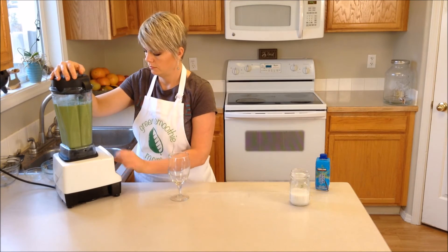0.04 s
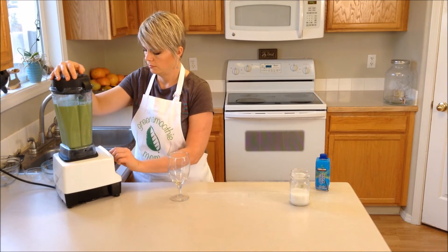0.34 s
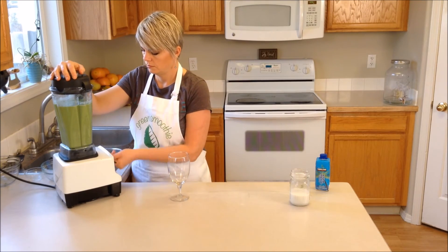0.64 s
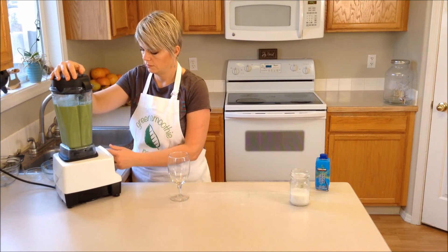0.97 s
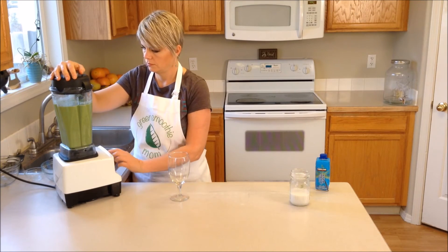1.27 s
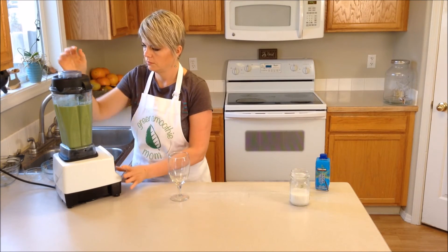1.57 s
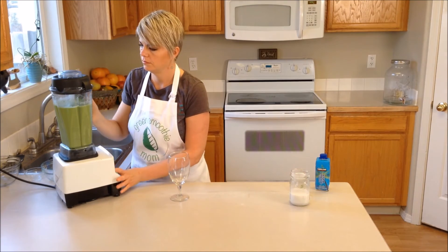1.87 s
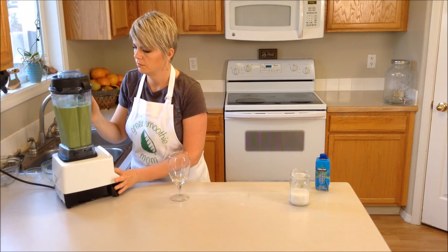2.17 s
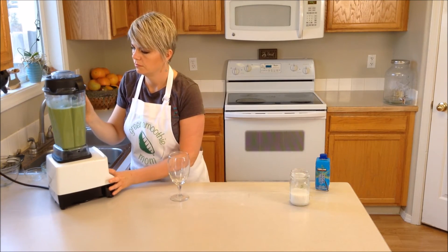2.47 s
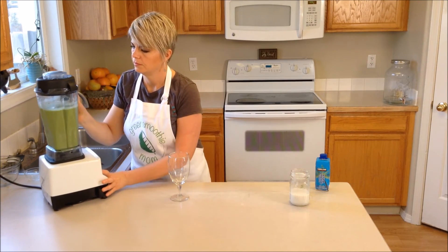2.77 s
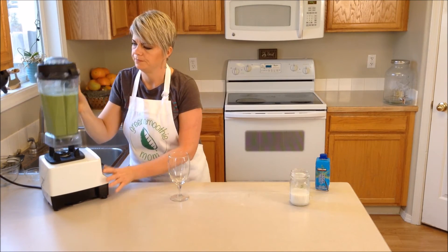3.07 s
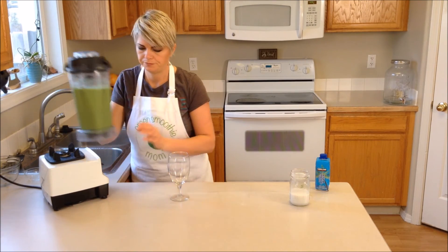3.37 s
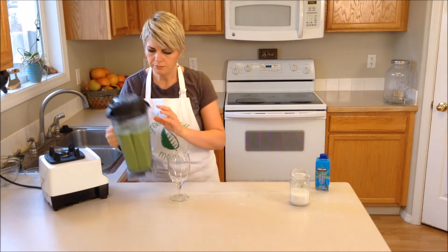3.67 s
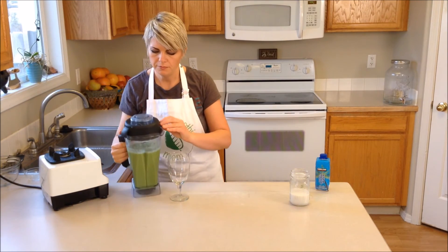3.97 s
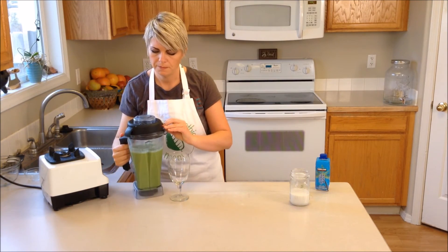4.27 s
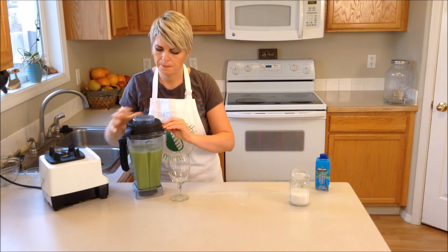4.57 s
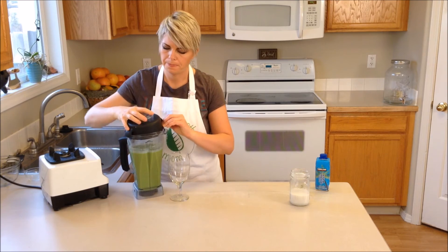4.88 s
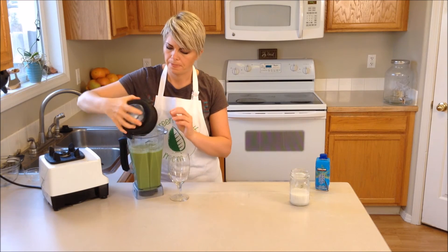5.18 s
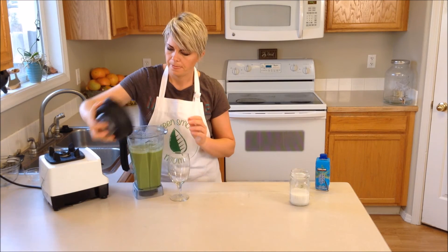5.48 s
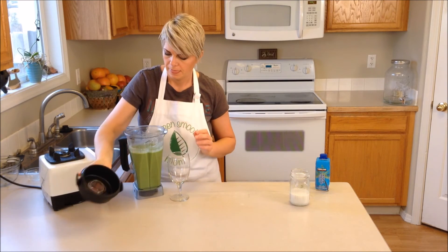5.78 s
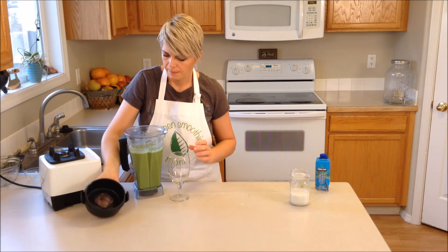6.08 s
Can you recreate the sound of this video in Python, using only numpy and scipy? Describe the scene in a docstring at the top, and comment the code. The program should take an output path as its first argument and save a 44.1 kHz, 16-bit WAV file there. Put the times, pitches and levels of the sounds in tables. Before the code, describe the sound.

A countertop blender full of smoothie snaps off and winds down, then its jar knocks on the counter and the lid pops off.

```python
"""A countertop blender full of smoothie is turned down, snaps off and coasts to a stop.
Its shaft shakes the base, whines in the housing, drives a fan and beats the load, all at one speed.
The plastic jar is lifted off and knocks on the counter; the rubber lid slips, pops free and is put down.
One microphone hears it across a hard-walled kitchen, over a faint appliance hum."""
import sys
import numpy as np
from scipy import signal
from scipy.fft import rfft, irfft, next_fast_len
from scipy.io import wavfile
from scipy.ndimage import map_coordinates

SR = 44100
rng = np.random.default_rng(int(sys.argv[2]) if len(sys.argv) > 2 else 0)


def store_pcm(level_fs):
    """Save levels as 16-bit WAV."""
    pcm = np.round(np.clip(level_fs, -1, 1) * 32767).astype(np.int16)
    wavfile.write(sys.argv[1], SR, np.atleast_2d(pcm).T)


N = 270333
TIME_S = np.arange(N) / SR


def amp(db):
    """Decibels to gain."""
    return 10 ** (np.asarray(db) / 20)


def unit_rms(x):
    """Scale to rms 1."""
    return x / np.sqrt(np.mean(x ** 2) + 1e-20)


def unit_energy(x):
    """Scale to energy 1."""
    return x / np.linalg.norm(x)


def along(points, hz):
    """Read (Hz, value) points on a log axis."""
    f, v = np.transpose(points)
    return np.interp(np.log(hz + 1), np.log(f + 1), v)


def wobble(rate_hz):
    """Smooth random curve, rate_hz knots a second."""
    knots = rng.standard_normal(int(N * rate_hz / SR) + 4)
    return map_coordinates(knots, [TIME_S * rate_hz])


def filtered(x, response):
    """Apply a frequency response."""
    size = next_fast_len(N + SR // 2)
    return irfft(rfft(x, size) * response(np.fft.rfftfreq(size, 1 / SR)), size)[:N]


def highpass(x, edge_hz):
    """Cut the bass."""
    return signal.sosfilt(signal.butter(4, edge_hz, "highpass", fs=SR, output="sos"), x)


def resonance(modes, f):
    """Response of (Hz, width Hz, dB) modes."""
    return sum(amp(db) * 1j * f * width / (hz * hz - f * f + 1j * f * width) for hz, width, db in modes)


def noise(response):
    """Coloured noise of rms 1."""
    return unit_rms(filtered(rng.standard_normal(N), response))


def impact(spectrum, tilt_db, size=4096):
    """Causal pulse of energy 1; harder contacts tilt its spectrum upward."""
    hz = np.fft.rfftfreq(size, 1 / SR)
    cepstrum = irfft(np.log(amp(along(spectrum, hz) + tilt_db * np.log2(1 + hz / 200))))
    cepstrum[1:size // 2] *= 2  # fold to minimum phase
    cepstrum[size // 2 + 1:] = 0
    return unit_energy(irfft(np.exp(rfft(cepstrum))))


def add(track, start_s, sound):
    """Mix a sound into the track."""
    part = track[round(start_s * SR):][:len(sound)]
    part += sound[:len(part)]


# kitchen echo decay (frequency [Hz], t60 [s])
ROOM_DECAY = [(120, 0.57), (300, 0.51), (1000, 0.61), (4000, 0.55), (8000, 0.35), (14000, 0.18)]
def room(x, direct_db):
    """Direct sound plus a fresh diffuse echo, total energy kept."""
    hz, t, spectra = signal.stft(rng.standard_normal(SR * 3 // 4), SR, nperseg=256)
    decay = amp(-60 * t / along(ROOM_DECAY, hz)[:, None])
    tail = signal.istft(spectra * decay, SR, nperseg=256)[1]
    tail *= 1 - np.exp(-np.arange(len(tail)) / SR / 0.00074)
    tail = unit_energy(tail)
    tail[0] = amp(direct_db)
    return signal.fftconvolve(x, unit_energy(tail))[:N]


# appliance tones (frequency [Hz], rms level [dB])
HUM_TONES = [(199.2, -66.5), (403.7, -62.5), (1157, -75.5), (1610, -71)]
# vent modes (frequency [Hz], width [Hz], gain [dB])
VENT_MODES = [(437, 91, -2.5), (840, 86, -3), (1565, 370, -4.5)]
# room air (frequency [Hz], relative density [dB])
ROOM_SPECTRUM = [(24, -80), (40, -34), (91, -35), (108, -14), (166, -14.5), (188, -7), (377, -6),
                 (407, -14), (438, -13.5), (1190, -19), (1310, -20.5), (1560, -26.5), (2510, -26.5),
                 (13300, -38.5), (15500, -38)]
def background():
    """Room air, and an appliance fan humming through its vent."""
    hum = sum(amp(db + 1.8 * wobble(4.23)) * np.sin(2 * np.pi * hz * TIME_S + 0.5 * wobble(5.26))
              for hz, db in HUM_TONES)
    vent = amp(-63) * noise(lambda f: abs(resonance(VENT_MODES, f)) ** 2)
    air = amp(-56.5) * noise(lambda f: amp(along(ROOM_SPECTRUM, f)))
    return air + vent + np.sqrt(2) * hum


# lid on counter (frequency [Hz], relative density [dB])
SCUFF_SPECTRUM = [(300, -27), (750, -1), (1300, -12), (2100, -8), (2450, 0.5), (3400, -3.5), (4000, -6),
                  (5400, -8), (6500, -14), (8500, -20), (11000, -30), (15000, -35)]
def lid_scuff(start_s=5.955, rise_s=0.019, fade_db_per_s=79):
    """The lid's edge brushes the counter as it is put down."""
    t = TIME_S - start_s
    level_db = -49 - fade_db_per_s * np.maximum(t, 0) + 1.8 * wobble(110)
    stroke = np.clip(t / rise_s, 0, 1) * amp(level_db)
    return room(stroke * noise(lambda f: amp(along(SCUFF_SPECTRUM, f))), direct_db=6)


# one tug of rubber (frequency [Hz], relative density [dB])
RUBBER_SPECTRUM = [(60, -32), (160, 3), (280, 11), (480, 1), (720, 0), (1000, 3), (1450, -4), (2200, -10.5),
                   (4000, -24), (9000, -40), (15000, -45)]
# slips on the rim (time [s], relative level [dB], length [s], tilt [dB/octave], ring [Hz])
LID_SLIPS = [(4.858, -50, .016, 5.5, 745), (4.875, -44.5, 0.023, 4, 734), (4.9, -51, .02, 4, 1600),
             (4.941, -50.5, 0.059, 3, 1480), (5.08, -51.5, 0.00505, 1, 1680), (5.147, -47, 0.04, 1.5, 634),
             (5.178, -55, 0.0086, 0, 690), (5.303, -57, 0.031, 6, 730)]
def lid_slips():
    """The seal sticks and slips in short runs; each slip rings the hollow lid at a varying pitch."""
    track = np.zeros(N)
    t = np.arange(SR // 10) / SR
    for start_s, db, length_s, tilt_db, ring_hz in LID_SLIPS:
        run = np.zeros(SR // 4)
        tug = impact(RUBBER_SPECTRUM, tilt_db)
        onsets_s = length_s * np.append(0, np.sort(rng.random(24)))
        for onset_s, (strength, detune) in zip(onsets_s, rng.standard_normal((25, 2))):
            hz = ring_hz * np.exp(0.05 * detune)
            ring = np.sin(2 * np.pi * hz * t) * amp(-60 * t / 0.024) * (1 - np.exp(-hz * t))
            add(run, onset_s, strength * unit_energy(ring))
            add(run, onset_s, strength * tug)
        add(track, start_s, amp(db + 31) * room(unit_energy(run), direct_db=1.5))
    return highpass(track, 114)


# hollow lid modes (frequency [Hz], relative level [dB], t60 [s])
LID_MODES = [(215, -2, 0.085), (318, 3.5, 0.062), (736, -9, 0.061), (1380, -2, 0.086), (1460, -7, .08),
             (1720, -10, 0.065), (2300, -12, .05)]
def lid_pop(start_s=4.892):
    """The seal gives way at once and the lid rings."""
    track = np.zeros(N)
    t = np.arange(SR // 5) / SR
    ring = sum(amp(db - 60 * t / t60) * np.sin(2 * np.pi * hz * t) for hz, db, t60 in LID_MODES)
    ring *= 1 - np.exp(-t / 0.0014)
    add(track, start_s, amp(-11) * room(unit_energy(ring), direct_db=6))
    return highpass(track, 125)


# pad and drive socket modes (frequency [Hz], width [Hz], gain [dB])
SOCKET_MODES = [(595, 210, 5), (820, 51, 11), (1180, 110, -2), (2480, 390, -15)]
# jar catching on the base
# (time [s], relative knock [dB], tilt [dB/octave], relative tick [dB], tick [Hz], tick width [Hz])
LIFT_CATCHES = [(2.833, -64, 5, -56, 5200, 420), (2.972, -51.5, -2, -64, 5300, 260),
                (3.04, -55, -7, -78, 4700, 260), (3.079, -47.5, 2.5, -61, 4700, 45),
                (3.112, -55, -19, -80, 4700, 260)]
def jar_lift():
    """The rising jar nudges the pad; the drive splines tick as they let go."""
    def struck(modes):
        return unit_energy(filtered(np.ones(1), lambda f: resonance(modes, f))[:SR // 10])

    track = np.zeros(N)
    for start_s, knock_db, tilt_db, tick_db, tick_hz, tick_width_hz in LIFT_CATCHES:
        knock = struck([(hz, width, db + tilt_db * np.log2(hz / 880)) for hz, width, db in SOCKET_MODES])
        tick = struck([(tick_hz, tick_width_hz, 0), (1.07 * tick_hz, 2 * tick_width_hz, -10)])
        add(track, start_s, amp(knock_db + 29) * room(knock, direct_db=-2))
        add(track, start_s, amp(tick_db + 25.5) * room(tick, direct_db=-1))
    return highpass(track, 280)


# full jar modes (frequency [Hz], relative level [dB], t60 [s])
JAR_MODES = [(148.7, 4.5, 0.41), (225.6, 1, 0.55), (304, 5, 0.072), (333, 0.5, 0.29), (513, -2, 0.2),
             (604, -7, .25), (740, -12, 0.24), (856, 6, 0.073), (1025, -4, 0.12), (1150, -11, 0.38),
             (1650, -9, 0.2), (1730, -6.5, 0.32), (1803, -13, 0.37), (2265, -11, 0.15), (4480, -19, 0.13)]
# counter thud (frequency [Hz], relative density [dB])
COUNTER_SPECTRUM = [(40, -13), (90, -33), (135, 1), (230, 8.5), (450, 6), (750, -0.5), (1300, -9.5),
                    (1800, -9), (2800, -18), (4700, -26), (7000, -33), (15000, -49)]
# jar settling (time [s], relative level [dB], tilt [dB/octave])
JAR_KNOCKS = [(4.0658, -28, 0), (4.08, -42, -2), (4.099, -41, -15), (4.2203, -36.5, -1), (4.254, -44, -7),
              (4.299, -50.5, 2), (4.4039, -50, 1), (4.4331, -45.5, 0.5)]
def jar_knocks():
    """Each knock thuds through the counter and rings the jar at new strengths."""
    track = np.zeros(N)
    t = np.arange(SR // 2) / SR
    hz, mode_db, t60 = np.transpose(JAR_MODES)[:, :, None]
    for start_s, db, tilt_db in JAR_KNOCKS:
        struck_db = mode_db + tilt_db * np.log2(1 + hz / 200) + 1.5 * rng.standard_normal(hz.shape)
        modes = amp(struck_db - 60 * t / t60) * np.sin(2 * np.pi * hz * t) * (1 - np.exp(-hz * t))
        thud = room(impact(COUNTER_SPECTRUM, tilt_db), direct_db=-6)
        add(track, start_s, amp(db + 29) * unit_energy(modes.sum(axis=0)))
        add(track, start_s, amp(db + 29) * thud)
    return highpass(track, 61)


# switch snap (frequency [Hz], relative density [dB])
SNAP_SPECTRUM = [(40, -26.5), (90, -18), (200, -22), (400, -5), (520, -9), (750, 0.5), (1200, 2),
                 (2500, -1), (4000, -1.5), (5000, -4), (7200, -4), (8600, 4.5), (10500, -9), (12500, -8.5),
                 (15500, -7)]
# rocker contacts (time [s], relative level [dB])
SWITCH_CONTACTS = [(1.148, -32.5), (1.1494, -28.5), (1.1519, -31.5), (1.153, -28)]
def switch():
    """The rocker snaps over in a cluster of contacts, each with its own spray of echoes."""
    track = np.zeros(N)
    t = np.arange(SR // 50) / SR
    snap = impact(SNAP_SPECTRUM, tilt_db=0)
    for start_s, db in SWITCH_CONTACTS:
        chatter = unit_energy(rng.standard_normal(len(t)) * amp(-60 * t / 0.013))
        add(track, start_s, amp(db + 28) * signal.fftconvolve(chatter, snap))
        add(track, start_s, amp(db + 30.5) * room(snap, direct_db=-22))
    return track


FULL_SPEED_HZ = 250
# driven shaft speed (time [s], speed [Hz])
DIAL_SPEED = [(0, 270), (.06, 226), (.125, 216), (.18, 218), (.225, 207), (.28, 235), (.36, 247),
              (.45, 257), (.54, 256), (.62, 247)]
def dial_speed():
    """Turns per second set by the dial."""
    return np.interp(TIME_S, *np.transpose(DIAL_SPEED))


def shaft_speed(stop_s=2.482, coast_scale_s=1.525, drag_hz=89.35):
    """Follows the dial, then coasts against square-law drag and steady friction, equal at drag_hz."""
    left_s = np.maximum(stop_s - TIME_S, 0)
    cap = np.arctan(2 * FULL_SPEED_HZ / drag_hz)
    coasting_hz = drag_hz * np.tan(np.minimum(left_s / coast_scale_s, cap))
    return np.minimum(dial_speed(), coasting_hz)


# bearing modes (frequency [Hz], width [Hz], gain [dB])
BEARING_MODES = [(1137, 300, 3), (2350, 200, -14)]
def bearing(start_s=1.723, end_s=2.21, ramp_s=0.059, fade_db_per_s=19):
    """The slowing blade bearing rubs once a turn until it lets go."""
    angle = 2 * np.pi * np.cumsum(shaft_speed()) / SR
    contact = np.clip(np.minimum(TIME_S - start_s, end_s - TIME_S) / ramp_s, 0, 1)
    level = amp(-50.5 - fade_db_per_s * np.maximum(TIME_S - start_s, 0))
    grind = noise(lambda f: abs(resonance(BEARING_MODES, f)) ** 2) * (1 + 0.53 * np.cos(angle))
    return room(contact * level * grind, direct_db=4)


# housing modes (frequency [Hz], width [Hz], gain [dB])
HOUSING_MODES = [(639, 8.1, 3), (774, 14, 2.5), (886, 14, 2.5), (966, 42, 2.5), (1042.5, 13, 3),
                 (1230, 110, -1), (1574, 25, -3.5), (1655, 24, -2), (2170, 54, -1.5), (2300, 29, -13),
                 (3400, 87, -3), (5900, 490, -9)]
def housing(f):
    """Response of the motor housing."""
    return resonance(HOUSING_MODES, f)


# commutator ring (frequency [Hz], width [Hz], gain [dB])
COMMUTATOR_MODES = [(5783, 408, 0.5)]
def commutator(speed_hz, octaves, angle, bars=22):
    """Bars tick under the brushes, sing in the housing and whistle while current flows."""
    ticks = sum(np.sin(bars * k * angle + 2 * wobble(330)) for k in range(2, 7))
    sing = filtered(ticks, lambda f: resonance(COMMUTATOR_MODES, f) ** 2 + amp(-11) * housing(f))
    sing *= amp(-44.5 + 4.8 * octaves + 1.9 * wobble(30)) * np.clip(speed_hz / 12, 0, 1)
    current = (speed_hz / dial_speed()) ** 8
    whistle = current * np.sin(bars * angle + 1.3 * wobble(260))
    whistle *= amp(-38 + 12.5 * octaves + 2.2 * wobble(25))
    return sing + filtered(whistle, lambda f: 0.85 + 0.15 * abs(resonance(COMMUTATOR_MODES, f)))


def shell_growl(speed_hz, octaves, angle, ring_hz=956, width_hz=100, fade_below_hz=111):
    """The fan keeps the shell ringing, in throbs once a turn."""
    shell = noise(lambda f: abs(resonance([(ring_hz, width_hz, 0)], f)) ** 2)
    fade = speed_hz ** 6 / (speed_hz ** 6 + fade_below_hz ** 6)
    return amp(-33.5 + 4.5 * octaves) * shell * (1 + 0.4 * np.cos(angle)) * fade


# cooling air (frequency [Hz], relative density [dB])
AIR_SPECTRUM = [(100, -70.5), (300, -10), (500, -13.5), (750, -14.5), (960, -7.5), (1400, -8), (2300, -9.5),
                (3000, -13), (5500, -14), (7000, -16.5), (9000, -17.5), (11500, -29.5), (15500, -28.5)]
# rubbing (frequency [Hz], relative density [dB])
RUB_SPECTRUM = [(150, -49), (500, -3.5), (900, -1.5), (1170, 1.5), (1600, -5.5), (2500, -2), (3500, -8),
                (4800, -10.5), (5900, -6.5), (7200, -17.5), (9000, -20.5), (12000, -23), (15500, -30)]
def air_and_rub(octaves, angle):
    """Cooling air and rubbing swell once a turn, coloured by the housing and the room's standing waves."""
    def hiss(spectrum):
        source = noise(lambda f: amp(along(spectrum, f)) * (1 + 0.3 * abs(housing(f))))
        return unit_rms(room(source, direct_db=7.5))

    air = amp(-27.5 + 12.5 * octaves + 0.93 * wobble(20.36)) * hiss(AIR_SPECTRUM)
    rub = amp(-31.5 + 6.5 * octaves + 0.9 * wobble(36)) * hiss(RUB_SPECTRUM)
    return (air + rub) * (1 + 0.029 * np.cos(angle))


# churning smoothie (frequency [Hz], relative density [dB])
CHURN_SPECTRUM = [(50, -28), (100, -23), (145, -14), (200, -3), (270, 1.5), (350, 10.5), (420, -6),
                  (520, -22), (1200, -36), (4000, -86)]
def blades(octaves, angle):
    """Four blades beat and churn the smoothie; a twice-a-turn push booms at the jar's lowest mode."""
    load_db = -34.5 + 6.5 * octaves
    beat = amp(load_db) * np.sin(4 * angle + wobble(25))
    beat = filtered(beat, lambda f: resonance([(286, 150, 0)], f) ** 2)  # broad jar resonance
    push = amp(load_db - 9.5) * np.sin(2 * angle)
    boom = filtered(push, lambda f: resonance([(142.4, 25, 0)], f) ** 3)
    surge = amp(load_db + 2.8 * wobble(15.25))
    churn = noise(lambda f: amp(along(CHURN_SPECTRUM, f)) * (1 + abs(resonance([(355.5, 8, 0)], f))))
    return beat, boom, surge * churn


# shaft overtones (multiple of shaft speed, relative level [dB])
SHAFT_ORDERS = [(2, -9), (3, -6.5), (4, -6), (5, -13.5), (6, -5.5), (7, -5.5), (8, -7.5), (9, -10),
                (10, -7), (11, -5), (12, -14.5)]
def shaft_whine(octaves, angle):
    """Each overtone swells as it crosses a housing mode."""
    whine_db = -28.3 + 20 * octaves
    orders = sum(amp(db + whine_db + 3 * wobble(20)) * np.sin(k * angle + 0.05 * k * wobble(90))
                 for k, db in SHAFT_ORDERS)
    return filtered(orders, lambda f: 0.16 + 0.61 * abs(housing(f)))


# modes of the base on its feet (frequency [Hz], width [Hz], gain [dB])
MOUNT_MODES = [(150, 17, -11.5), (209.4, 21, -12.5), (241.5, 18, -16), (259.3, 15.3, 1)]
def base_shake(speed_hz, octaves, angle, lag_s=0.031):
    """The unbalanced shaft's hum swells near each base mode and lurches more below full speed."""
    swell = sum(amp(db) / (1 + (2 * (speed_hz - hz) / width) ** 2) for hz, width, db in MOUNT_MODES)
    swell = np.interp(TIME_S - lag_s, TIME_S, swell)
    lurch_db = 3.5 * np.clip(-6 * octaves, 0.15, 1) * wobble(38)
    hum = amp(-19 + 12 * octaves + lurch_db) * swell * np.sin(angle)
    return room(highpass(hum, 68), direct_db=7.5)


def blender():
    """Shaft, fan, blades and commutator follow one speed; each loses its own dB per octave of slowing."""
    speed_hz = shaft_speed()
    octaves = np.log2(speed_hz / FULL_SPEED_HZ + 1e-6)
    load_tug = 1 + 0.00303 * wobble(34.98)
    angle = 2 * np.pi * np.cumsum(speed_hz * load_tug) / SR
    shake = base_shake(speed_hz, octaves, angle)
    whine = shaft_whine(octaves, angle)
    beat, boom, churn = blades(octaves, angle)
    brushes = commutator(speed_hz, octaves, angle)
    roar = churn + shell_growl(speed_hz, octaves, angle) + air_and_rub(octaves, angle)
    tones = shake + boom + room(whine + beat + brushes, direct_db=2.5)
    return np.sqrt(2) * tones + roar


def scene():
    """One microphone, alike in both channels."""
    mono = blender() + bearing() + switch()
    mono += jar_lift() + jar_knocks() + lid_slips() + lid_pop() + lid_scuff() + background()
    return np.array([mono, mono])


# treble dropouts (time [s], half length [s], depth [dB])
TREBLE_DIPS = [(.286, .013, 26), (.947, .012, 20)]
def record(dry):
    """The treble drops out twice, briefly; nothing passes above the band limit."""
    band_limit_hz = 15450
    dip_db = sum(db * np.exp(-((TIME_S - s) / half_s) ** 4) for s, half_s, db in TREBLE_DIPS)
    treble = filtered(dry[0], lambda hz: np.clip((hz - 1600) / 1900, 0, 1))
    mono = filtered(dry[0] - (1 - amp(-dip_db)) * treble, lambda hz: hz < band_limit_hz)
    return np.array([mono, mono])


dry = scene()
out = record(dry)
store_pcm(out)
```